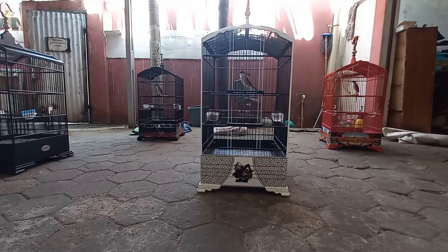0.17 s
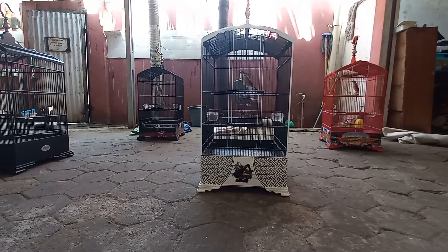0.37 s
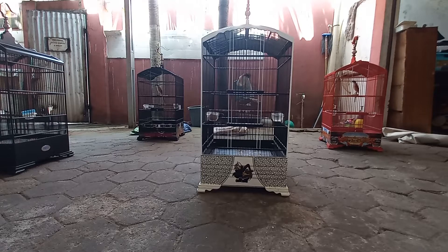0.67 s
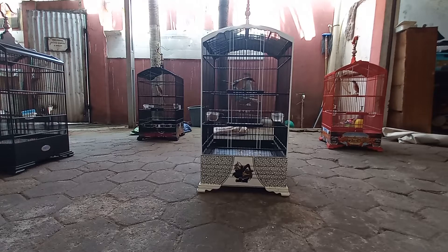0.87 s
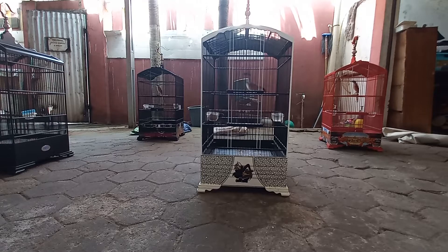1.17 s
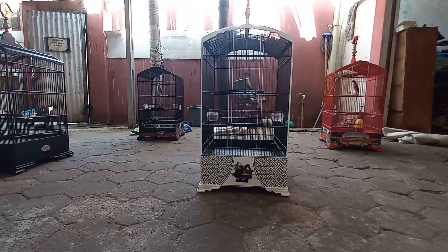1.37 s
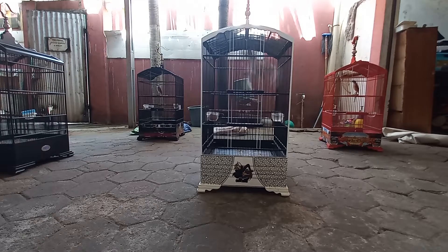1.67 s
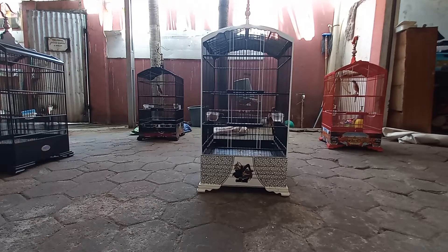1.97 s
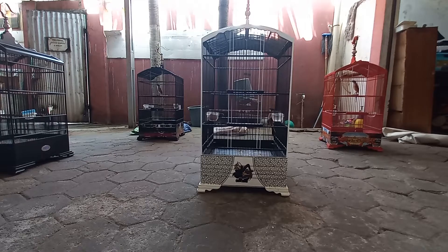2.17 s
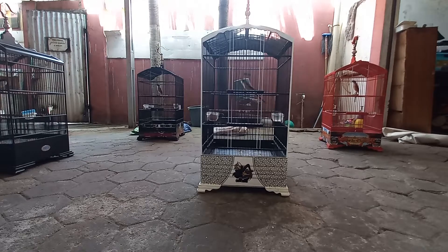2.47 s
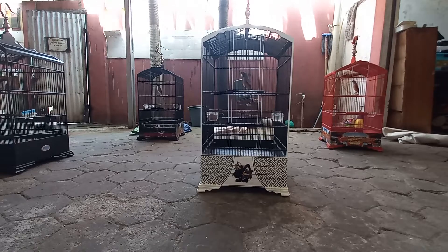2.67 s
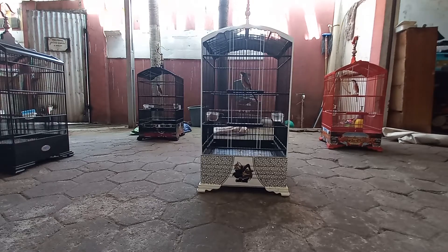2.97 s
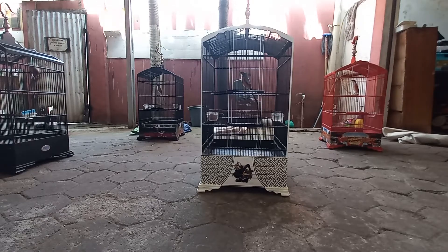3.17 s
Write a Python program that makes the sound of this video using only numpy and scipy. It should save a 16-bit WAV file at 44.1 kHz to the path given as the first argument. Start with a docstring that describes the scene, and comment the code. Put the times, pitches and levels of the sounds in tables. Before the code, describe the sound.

Stereo microphone at a short distance in a paved yard: two nasal chirps, one loud climbing and falling bird call, then denser chirps and thin whistles with soft flutter, hopping ticks, short echoes and quiet low hum.

```python
"""Caged birds in a hard-walled paved yard; a wavering low hum and the outdoor floor run throughout.
From the start nasal chirps come from the right, glided harmonic tones with rasp; whistles join after 1 s.
At 0.2 s a shrike straight ahead gives one long rising nasal call that breaks into a falling one.
From 1.4 s a bird flutters and hops in its cage: pulsed noise and decaying noise taps.
Echo noise rings after every bird sound."""
import sys
import numpy as np
from scipy import signal
from scipy.fft import rfft, irfft, next_fast_len
from scipy.io import wavfile
from scipy.ndimage import map_coordinates

SR = 44100
rng = np.random.default_rng(int(sys.argv[2]) if len(sys.argv) > 2 else 0)


def transcribe(signal):
    """Save signal, clipped to [-1, 1], as a 16-bit WAV file at the path in sys.argv[1]."""
    frames = np.atleast_2d(signal).T
    limited = np.clip(frames, -1, 1)
    pcm = np.round(limited * 32767).astype(np.int16)
    wavfile.write(sys.argv[1], SR, pcm)


N = 145530
TOP_HZ = 15750  # upper band limit
VOICE_DB = -1.5  # trim on all bird voices

# colour of the air noise in the voices: f/Hz, relative level/dB
RASP_COLOUR = [(1000, -66), (1800, -16), (2400, 3.5), (4500, 6.5), (5800, -13), (7000, -16.5), (10000, -25),
               (12500, -18), (15500, -25)]


def amp(db):
    """Gain of a level in dB."""
    return 10 ** (np.asarray(db) / 20)


def unit(x):
    """x at rms 1."""
    return x / np.sqrt(np.mean(x ** 2) + 1e-20)


def along(points, hz):
    """(Hz, value) points interpolated on a log frequency axis."""
    f, v = np.transpose(points)
    return np.interp(np.log(hz + 1), np.log(f + 1), v)


def curves(rows, t):
    """Each column after the time, read at times t."""
    s, *cols = np.transpose(rows)
    return [np.interp(t, s, c) for c in cols]


def wobble(rate, size=N):
    """Smooth random curve, rate knots per second."""
    knots = rng.standard_normal(size // 8 + 8)
    return map_coordinates(knots, [np.arange(size) * rate / SR], mode='wrap')


def filtered(x, response):
    """x times a complex response of frequency."""
    m = next_fast_len(N + SR // 2)
    hz = np.fft.rfftfreq(m, 1 / SR)
    return irfft(rfft(x, m) * response(hz), m)[..., :N]


def noise(colour):
    """Coloured noise of rms 1."""
    return unit(filtered(rng.standard_normal(N), lambda hz: amp(along(colour, hz))))


def add(track, s, x):
    """Mix x into the track at time s."""
    i = max(0, round(s * SR))
    track[i:i + len(x)] += x[:N - i]


def background():
    """Outdoor rumble and faint air: two noises rotated by frequency, nearly mono in the bass."""
    floor_colour = [(20, -21), (35, -20), (65, -3.5), (120, -1), (184, -7), (277, -12), (360, -12),
                    (700, -23), (1100, -28), (2000, -72), (5000, -24.5), (15000, -44.5)]  # outdoor floor: f/Hz, relative level/dB per Hz
    likeness = [(60, 1), (150, 1), (300, 0.73), (600, 0.33), (2000, 0.067)]  # left-right likeness: f/Hz, correlation (0-1)
    floor_db = -71

    def mid_side(hz):
        turn = np.arccos(np.clip(along(likeness, hz), -1, 1)) / 2
        return np.array([np.cos(turn), np.sin(turn)])

    mid, side = filtered(np.array([noise(floor_colour), noise(floor_colour)]), mid_side)
    return amp(floor_db) * unit(np.array([mid + side, mid - side]))


def hum():
    """Low hum: two groups of sine lines, each line wavering in pitch and level."""
    # group levels: t/s, low lines/dB, high lines/dB
    swell = [(0, -80, -93), (.5, -74.5, -80), (.7, -72.5, -71), (1, -79, -78.5), (1.25, -71.5, -70),
             (1.6, -68.5, -78), (1.95, -71, -69), (2.4, -67.5, -74), (2.8, -77, -92), (3.2, -67.5, -70.5)]
    # lines of each group: f/Hz, level within the group before waver/dB
    low_lines = [(80, -2), (124, 1.5)]
    high_lines = [(172, 0), (196, -2)]
    waver_ratio, waver_db = 0.025, 1.5

    def line(hz, db):
        level = amp(db + waver_db * wobble(7.11))
        pitch_hz = hz * (1 + waver_ratio * wobble(19))
        return level * np.sin(2 * np.pi * np.cumsum(pitch_hz) / SR)

    low_db, high_db = curves(swell, np.arange(N) / SR)
    low = unit(sum(line(*row) for row in low_lines))
    high = unit(sum(line(*row) for row in high_lines))
    return amp(low_db) * low + amp(high_db) * high


def gate(t, length):
    """Quarter-sine attack, hold, and release centred on the note's length."""
    attack_s, release_s = 0.012, 0.0091
    rise = np.sin(np.pi / 2 * np.clip(t / attack_s, 0, 1))
    fall = np.sin(np.pi / 2 * np.clip((length - t) / release_s + 0.5, 0, 1))
    return rise * fall


def syrinx(hz, partials_db, overtones_db, rough, count=11):
    """Harmonic tone whose pitch and strength tremble with roughness."""
    overtone_colour = [(4500, 15), (6000, 0.5), (7400, 1.5), (9000, -7), (10300, -14.5), (12300, -5.5),
                       (13500, -13), (15000, -19)]  # partials without their own level: f/Hz, offset/dB
    # scatter at roughness 1, and pitch knots per second
    jitter_ratio, shimmer_db, jitter_per_s = 0.084, 7.5, 1500
    hz = hz * (1 + jitter_ratio * rough * wobble(jitter_per_s, size=len(hz)))
    phase = 2 * np.pi * np.cumsum(hz) / SR
    tone = 0
    for k in range(1, count + 1):
        if k <= len(partials_db):
            db = partials_db[k - 1]
        else:
            db = overtones_db + along(overtone_colour, k * hz)
        tone = tone + amp(db) * (k * hz < TOP_HZ) * np.sin(k * phase)
    shimmer = amp(shimmer_db * rough * wobble(jitter_per_s / 2, size=len(hz)))
    return np.sqrt(2) * tone * shimmer


def glide(t, length, start, middle, end):
    """Parabolic pitch path through three pitches."""
    u = np.clip(t / length, 0, 1)
    return start + (end - start) * u + (2 * middle - start - end) * 2 * u * (1 - u)


def bloom(t):
    """dB by which a chirp's overtones and rasp lag the tone as they swell in."""
    bloom_s, bloom_db = 0.021, 9.5
    return -bloom_db * np.clip(1 - t / bloom_s, 0, 1)


def chatter():
    """Nasal chirps, rough ones carrying air noise, and whistles of three partials."""
    # nasal chirps: t/s, length/s, start f/Hz, middle f/Hz, end f/Hz, 1st partial/dB, 2nd partial/dB,
    # 3rd partial/dB, higher overtones/dB, roughness (0-1); levels before the trim
    chirps = [(0, 0.046, 1395, 1494, 1737, -88, -52.5, -48, -60.5, 0.82),
              (0.151, 0.048, 1373, 1525, 1690, -81, -52, -46.5, -58, 0.84),
              (0.781, 0.028, 1337, 1670, 1507, -92, -45.5, -51, -63.5, 0.65),
              (1.262, 0.032, 1794, 1626, 1550, -84, -54, -69, -49.5, 0.5),
              (1.404, 0.034, 1771, 1633, 1532, -95, -49, -32, -49.5, 0.14),
              (1.537, 0.044, 1489, 1348, 1274, -90, -54.5, -47, -71, 0.44),
              (1.665, 0.094, 1391, 1634, 1755, -63, -53, -59.5, -68, .7),
              (1.81, .05, 1551, 1455, 1369, -71, -50, -47.5, -64, 0.77),
              (1.858, 0.068, 1375, 1272, 1115, -88, -55, -49, -78, 0.64),
              (2.015, 0.034, 1715, 1522, 1380, -93, -69, -41, -62.5, 0.42),
              (2.038, 0.034, 1390, 1162, 1024, -88, -51, -52, -64, 0.06),
              (2.094, .04, 1804, 1693, 1496, -91, -75, -34, -52, .35),
              (2.218, 0.06, 1388, 1324, 1217, -92, -53, -49.5, -81.5, 0.53),
              (2.374, .061, 1423, 1703, 1826, -63, -44.5, -48, -57, 0.52),
              (2.431, 0.11, 1786, 1945, 2013, -61.5, -42, -58, -66, 0.39),
              (2.836, 0.041, 1426, 1515, 1469, -81, -46, -41.5, -50, 0.48),
              (3.004, 0.032, 1296, 1498, 1536, -83, -46.5, -39.5, -51.5, 0.54),
              (3.202, 0.038, 1412, 1378, 1316, -97, -61.5, -48.5, -65, .6)]
    # whistles: t/s, length/s, start f/Hz, middle f/Hz, end f/Hz, level/dB, overtones/dB, roughness (0-1)
    whistles = [(1.093, 0.036, 4890, 6200, 6380, -50.5, -61, 0.27),
                (1.116, .02, 6350, 6050, 5283, -36.5, -44, 0.6),
                (1.253, .052, 6100, 6160, 5730, -39.5, -47, 0.67),
                (1.393, 0.025, 4156, 5000, 5420, -40.5, -60, 0.25),
                (1.665, 0.078, 4220, 4450, 4550, -51.5, -96, 0.49),
                (2.101, 0.021, 7330, 5790, 5020, -40.5, -62, 0.3),
                (2.369, 0.044, 4070, 4610, 4710, -42.5, -93, .5),
                (2.497, 0.043, 2690, 2816, 2770, -45, -69, 0.14),
                (2.697, 0.021, 4020, 4910, 6140, -36, -72, 0.24),
                (2.713, 0.037, 5900, 5876, 5760, -35.5, -44, 0.53),
                (2.862, 0.018, 6330, 5630, 4690, -36.5, -42.5, 0.28),
                (3.025, 0.017, 6045, 5300, 4020, -35.5, -43.5, 0.41)]
    rasp_db = -7  # at roughness 1, before the factor 2 below
    voice, rasp = np.zeros(N), np.zeros(N)
    t = np.arange(SR // 6) / SR
    for s, length, start, middle, end, first, second, third, upper, rough in chirps:
        shape = gate(t, length)
        hz = glide(t, length, start, middle, end)
        add(voice, s, shape * syrinx(hz, [first, second, third], upper + bloom(t), rough))
        air = rough * amp(rasp_db + bloom(t)) * 2 * (amp(second) + amp(third))
        add(rasp, s, shape * air)
    for s, length, start, middle, end, db, upper, rough in whistles:
        hz = glide(t, length, start, middle, end)
        add(voice, s, gate(t, length) * syrinx(hz, [db], upper, rough, count=3))
    return voice + rasp * noise(RASP_COLOUR)


def long_call():
    """Climbing nasal harmonic note that breaks into an overlapping, falling one."""
    # both parts: t/s, f/Hz, 1st partial/dB, 2nd partial/dB, 3rd partial/dB, higher overtones/dB
    rise = [(0.206, 1200, -61, -60.5, -52.5, -52.5), (.232, 1428, -52.5, -34.5, -27, -43),
            (0.253, 1524, -58, -26.5, -30, -42), (0.288, 1486, -55, -27, -42, -76.5),
            (.318, 1528, -47.5, -30, -52, -54), (.355, 1709, -56.5, -34.5, -53, -70),
            (0.407, 1740, -58.5, -44, -56.5, -64), (0.448, 1963, -49.5, -31.5, -55, -55.5),
            (0.499, 2230, -39.5, -29.5, -43.5, -37), (0.525, 2269, -36.5, -27, -43, -44.5),
            (0.538, 2390, -28.5, -62, -53, -55), (.562, 2500, -29, -62, -52, -59),
            (0.577, 2270, -45.5, -67, -52, -72)]
    fall = [(.553, 1650, -82, -68, -37.5, -65), (.575, 1760, -80, -46.5, -35.5, -59.5),
            (0.596, 1686, -85, -41.5, -30.5, -45), (.612, 1542, -86, -43.5, -30.5, -51),
            (.635, 1492, -95, -48.5, -32.5, -56), (0.689, 1463, -93, -46, -27.5, -55),
            (0.714, 1445, -83, -55, -40.5, -62)]
    roughness, rasp_db, harmonics = 0.045, -31, 9  # rasp relative to the first three partials
    voice, rasp = np.zeros(N), np.zeros(N)
    t = np.arange(SR // 2) / SR
    for part in (rise, fall):
        s = part[0][0]
        hz, first, second, third, upper = curves(part, s + t)
        shape = gate(t, part[-1][0] - s)
        add(voice, s, shape * syrinx(hz, [first, second, third], upper, roughness, count=harmonics))
        add(rasp, s, shape * amp(rasp_db) * (amp(first) + amp(second) + amp(third)))
    return voice + rasp * noise(RASP_COLOUR)


def wings():
    """Soft flutter: low noise pulsed at the wingbeat rate."""
    flutter = [(1.4, -74), (1.47, -65), (1.55, -59), (1.64, -70.5), (1.76, -72), (1.82, -61), (1.9, -64.5),
               (2.02, -71)]  # t/s, level/dB
    wing_colour = [(25, -28), (70, 10), (150, 2.5), (350, -5), (900, -17), (4000, -17.5), (15000, -39)]  # f/Hz, relative level/dB
    wingbeat_hz = 28
    t = np.arange(N) / SR
    level_db, = curves(flutter, t)
    beats = unit(np.sin(np.pi * wingbeat_hz * t + wobble(9.1)) ** 2)
    return amp(level_db) * beats * noise(wing_colour)


def hops():
    """Feet on perch and bars: short exponentially decaying noise taps."""
    steps = [(1.52, -42.5), (1.533, -52), (1.59, -47.5), (1.69, -53), (1.755, -41), (1.77, -81.5),
             (1.896, -51), (2.343, -54.5)]  # t/s, level/dB
    hop_colour = [(25, -17), (60, 9), (300, 0.5), (700, -5), (1600, -5), (4000, 6.5), (9000, -13),
                  (15000, -5)]  # f/Hz, relative level/dB
    t60_s = 0.032
    t = np.arange(SR // 4) / SR
    taps = np.zeros(N)
    for s, db in steps:
        add(taps, s, amp(db - 60 * t / t60_s))
    return taps * noise(hop_colour)


def yard(x, left_lag_s, direct_db):
    """Direct sound, sparse quick echoes from paving and cages, and the walls' diffuse ring."""
    wall_t60 = [(200, 0.17), (1500, 0.48), (2600, 0.64), (4400, 0.58), (6500, 0.64), (9000, 0.43),
                (14000, 0.4)]  # f/Hz, t60/s
    early_db, early_t60_s = -3.5, 0.17
    tail_db, tail_rise_s, tail_likeness = -4, 0.0089, 0.1
    size = int(0.9 * SR)
    t = np.arange(size) / SR

    # tail: partly shared stereo noise, decaying per frequency
    a, b = rng.standard_normal((2, size))
    turn = np.arccos(np.clip(tail_likeness, -1, 1)) / 2
    diffuse = np.cos(turn) * a + np.sin(turn) * np.array([b, -b])
    hz, s, z = signal.stft(diffuse, SR, nperseg=256)
    decay = amp(-60 * s / along(wall_t60, hz)[:, None])
    tail = signal.istft(z * decay, SR, nperseg=256)[1][:, :size]
    tail = tail * (1 - np.exp(-t / tail_rise_s))

    # early: 5 % of samples, none in the first 2 ms
    sparse = rng.standard_normal((2, size)) * (rng.random(size) < 0.05) * (t > 0.002)
    early = sparse * amp(-60 * t / early_t60_s)
    early = np.array([unit(side) for side in early])

    echo = (amp(tail_db) * unit(tail) + amp(early_db) * early) / np.sqrt(size)
    ears = np.array([[-1], [1]])  # left late, right early by half the lag each
    direct = filtered(x, lambda hz: np.exp(np.pi * 1j * hz * left_lag_s * ears))
    return amp(direct_db) * direct + signal.fftconvolve(x[None], echo, axes=1)[:, :N]


def scene():
    """Chatter to the right, call and cage sounds ahead, over the hum and outdoor floor."""
    right = yard(amp(VOICE_DB) * chatter(), left_lag_s=0.000215, direct_db=-4)
    ahead = yard(amp(VOICE_DB) * long_call() + wings() + hops(), left_lag_s=0.00001, direct_db=-3)
    return ahead + right + hum() + background()


def record(dry):
    """Microphone response: second-order bass roll-off and a sharp upper band limit."""
    low_cut_hz = 42
    return filtered(dry, lambda hz: (hz < TOP_HZ) * hz ** 2 / np.sqrt(hz ** 4 + low_cut_hz ** 4))


dry = scene()
out = record(dry)
transcribe(out)
```